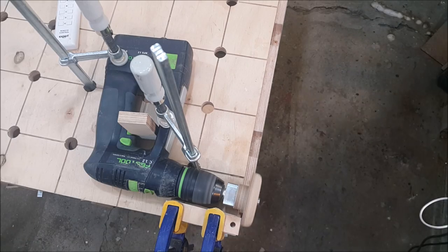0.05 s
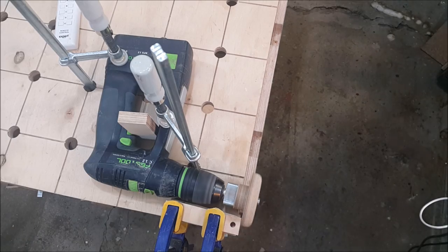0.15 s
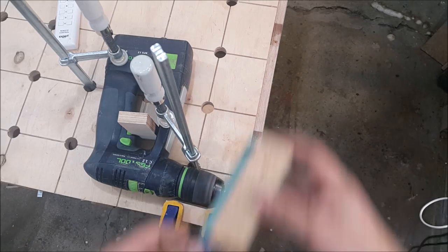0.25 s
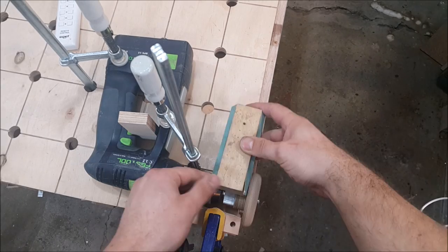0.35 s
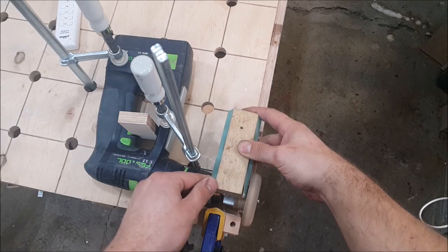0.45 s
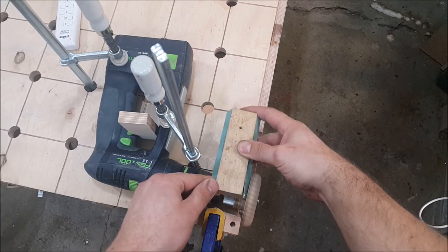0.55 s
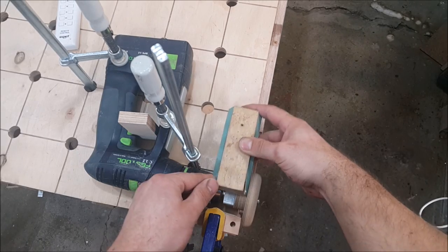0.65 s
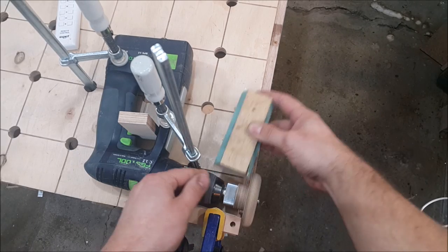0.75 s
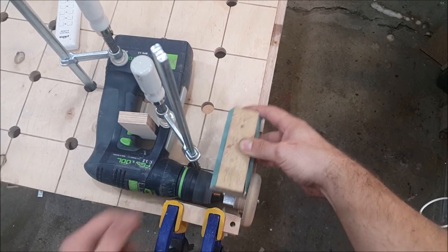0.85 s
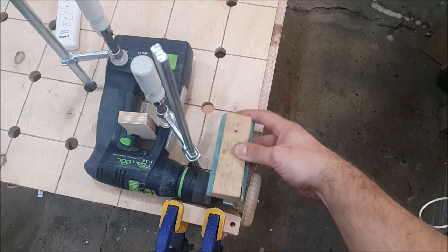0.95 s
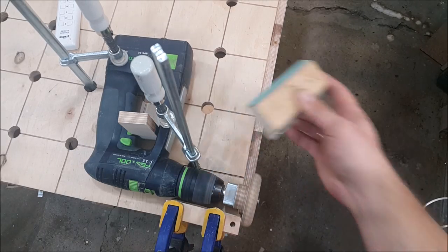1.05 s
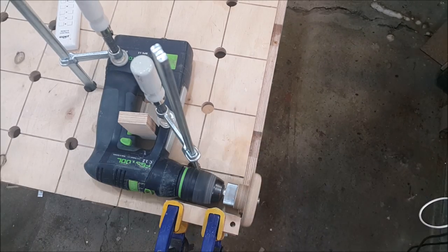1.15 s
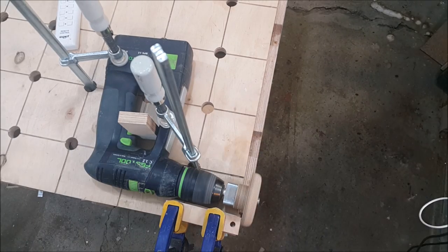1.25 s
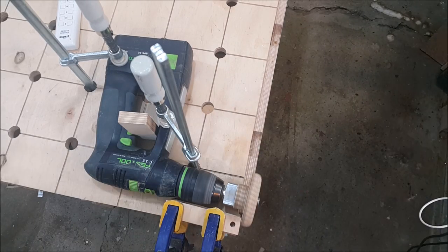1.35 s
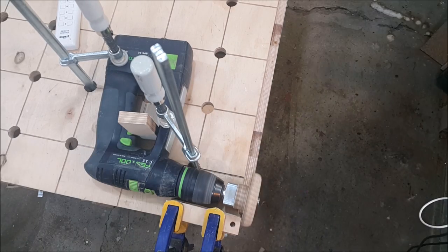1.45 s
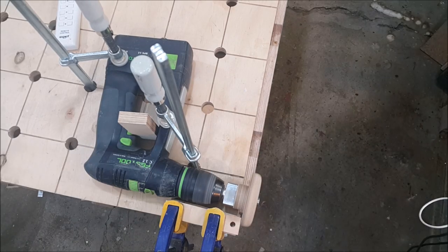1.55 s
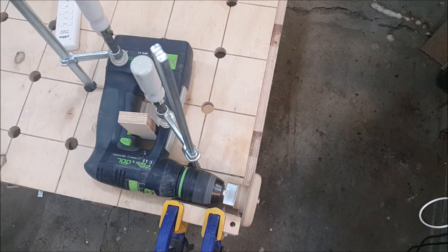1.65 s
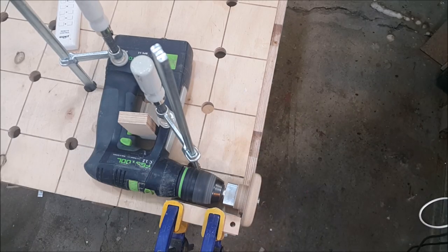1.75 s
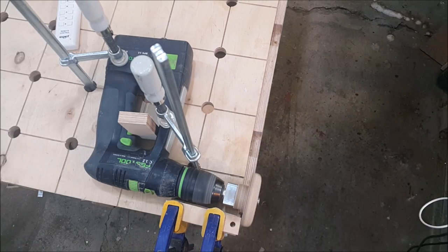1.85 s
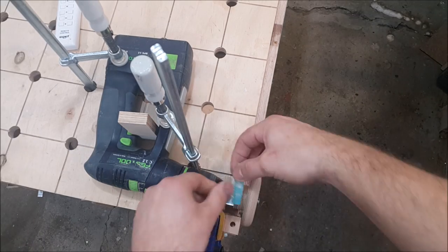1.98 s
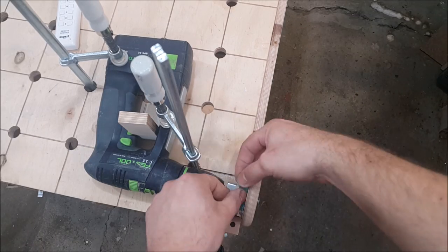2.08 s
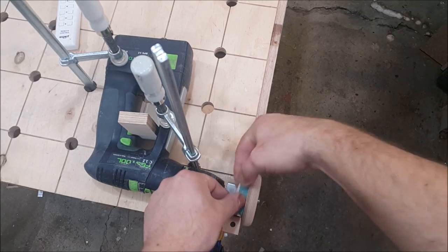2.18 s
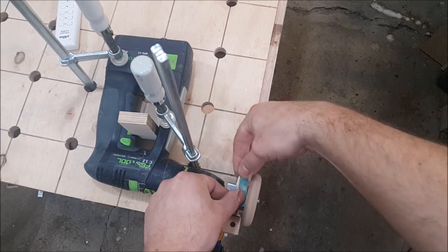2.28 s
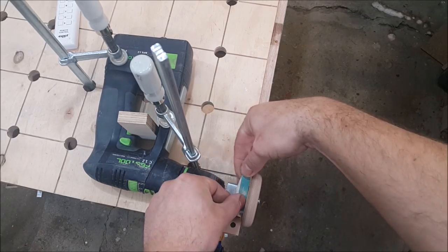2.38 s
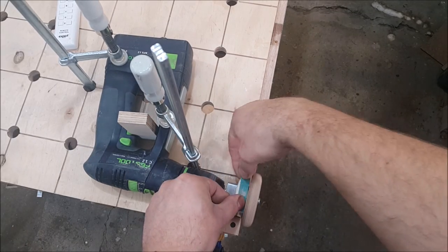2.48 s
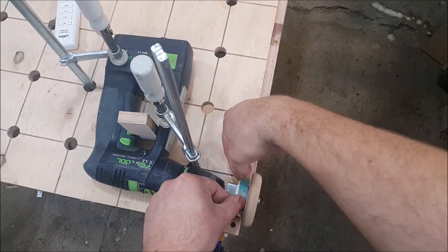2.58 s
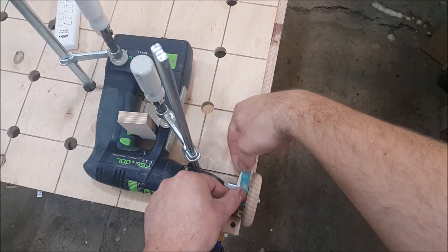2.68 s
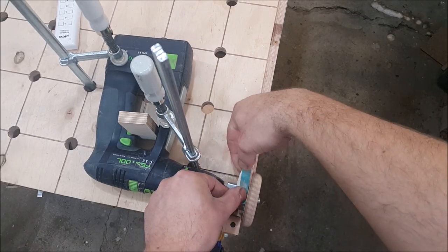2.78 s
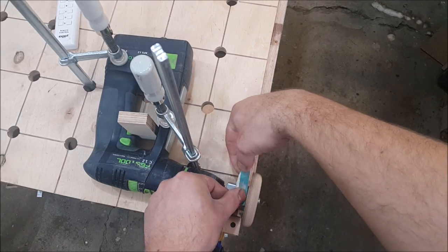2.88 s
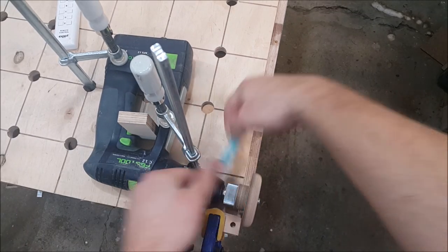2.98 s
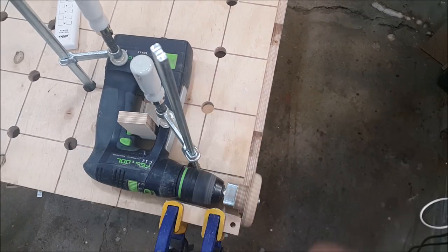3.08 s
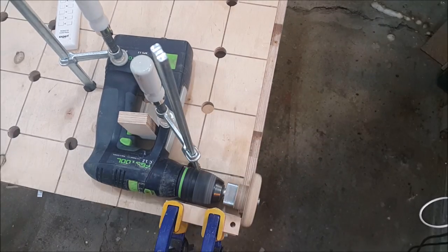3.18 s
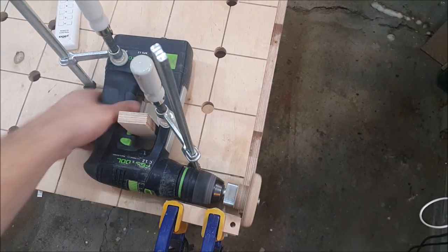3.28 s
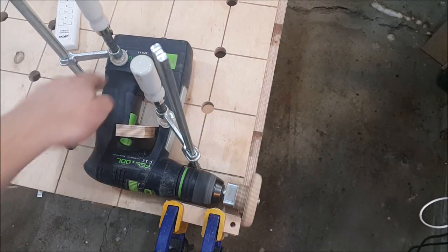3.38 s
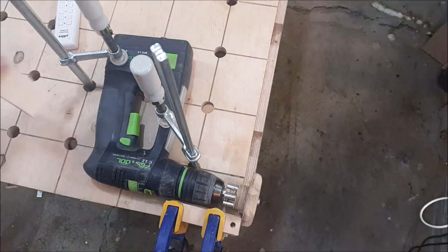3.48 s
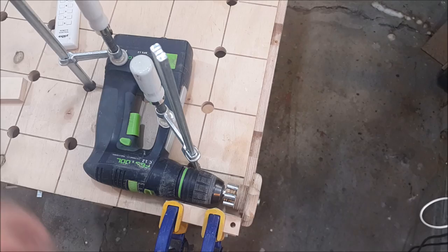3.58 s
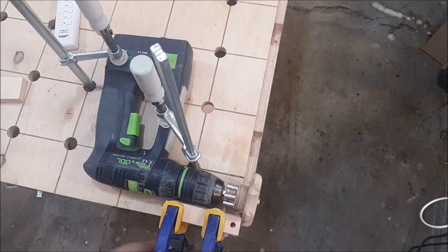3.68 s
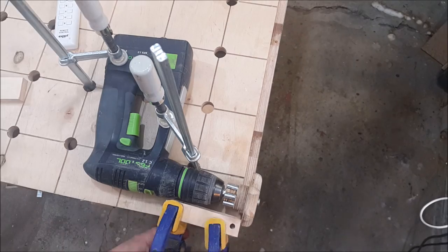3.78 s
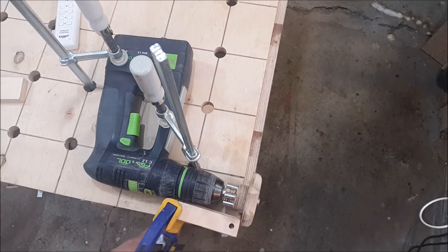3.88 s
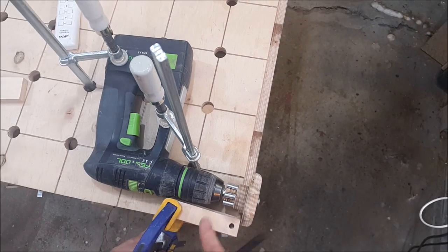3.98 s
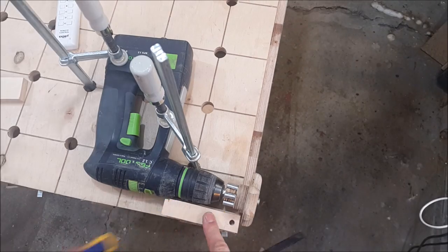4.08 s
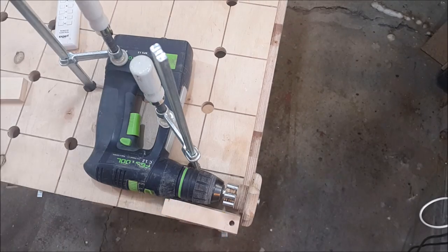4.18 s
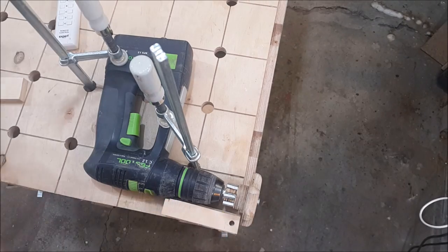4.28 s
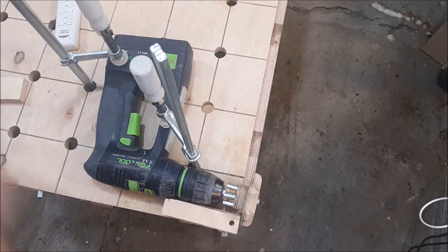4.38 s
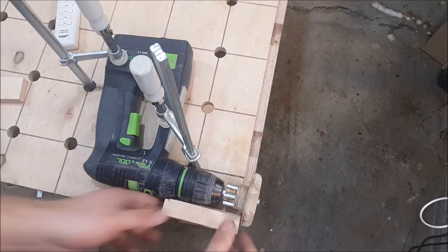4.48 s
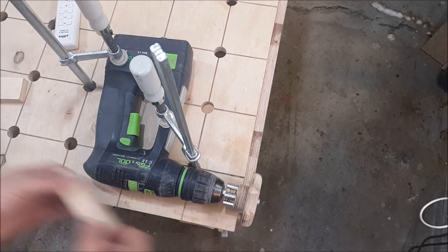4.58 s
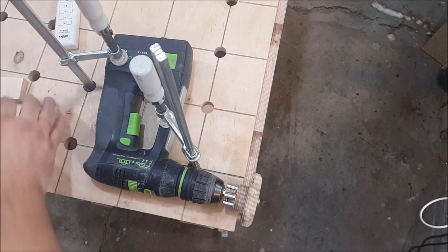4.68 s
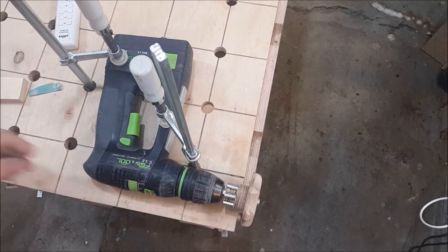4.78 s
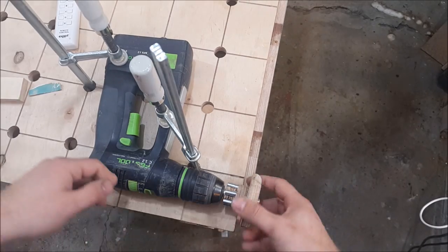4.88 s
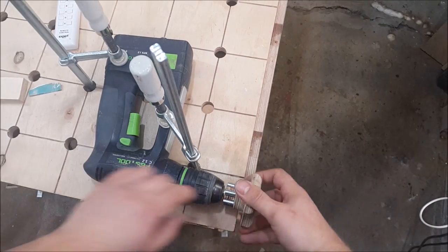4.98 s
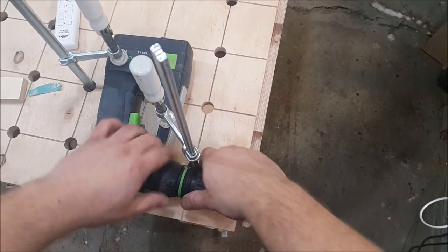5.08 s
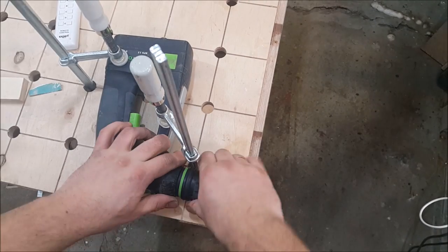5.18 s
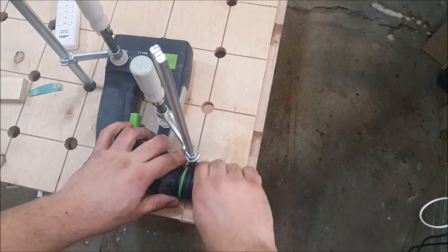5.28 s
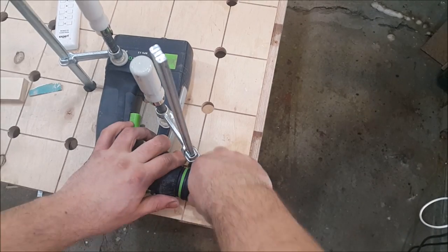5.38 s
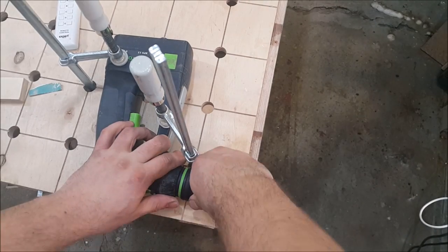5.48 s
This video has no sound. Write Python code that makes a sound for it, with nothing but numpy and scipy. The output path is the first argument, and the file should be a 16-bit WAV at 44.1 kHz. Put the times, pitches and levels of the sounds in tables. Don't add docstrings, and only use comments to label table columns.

```python
import sys
import numpy as np
from scipy import signal
from scipy.fft import rfft, irfft, next_fast_len
from scipy.io import wavfile
from scipy.ndimage import uniform_filter1d, minimum_filter1d

SR = 44100
rng = np.random.default_rng(int(sys.argv[2]) if len(sys.argv) > 2 else 0)


def inscribe(sig):
    pcm = np.round(np.clip(np.atleast_2d(sig).T, -1, 1) * 32767)
    wavfile.write(sys.argv[1], SR, pcm.astype(np.int16))


def makeup_ratio(level_db):
    decades = np.asarray(level_db, float) / 20
    return 10 ** decades


N = 244306
TIME = np.arange(N) / SR
HZ = np.fft.rfftfreq(next_fast_len(N), 1 / SR) + 1e-3
STOP_S = 3.537


def rms_one(x):
    return x / np.sqrt(np.mean(x ** 2) + 1e-20)


def in_time(rows):
    s, *columns = np.transpose(rows)
    return [np.interp(TIME, s, c) for c in columns]


def at_hz(points):
    hz, value = np.transpose(points)
    return np.interp(np.log(HZ), np.log(hz), value)


def modes(table, base_db):
    peaks = sum(makeup_ratio(2 * db) / (1 + (2 * (HZ - hz) / width) ** 2) for hz, width, db in table)
    return np.sqrt(makeup_ratio(2 * base_db) + peaks)


def drift(rate):
    steps_hz = 200
    steps = rng.standard_normal(int(N / SR * steps_hz) + 2)
    slow = signal.sosfiltfilt(signal.butter(1, min(rate, 90), fs=steps_hz, output="sos"), steps)
    return np.interp(TIME * steps_hz, np.arange(len(slow)), rms_one(slow))


def pan(db):
    return np.array([makeup_ratio(db / 2), makeup_ratio(-db / 2)])


# f/Hz, likeness 0-1
PORT_LIKENESS = [(60, 0.047), (300, 0.87), (700, 0.65), (1400, 0.83), (2500, 0.55), (4000, 0.5),
                 (8000, 0.32), (16000, 0.027)]
# f/Hz, left-right/dB
PORT_BALANCE = [(60, 2.5), (110, -10), (200, 13), (380, 6.5), (700, 1.5), (1290, 4), (2380, 1), (4400, 0.5),
                (8120, 4), (15000, 3.5)]


def stereo_noise(gain):
    lag_s = 5.5e-5
    size = next_fast_len(N)
    left, other = rfft(rng.standard_normal((2, size)))
    alike = np.clip(at_hz(PORT_LIKENESS), 0, 1)
    right = alike * left * np.exp(-2j * np.pi * HZ * lag_s) + np.sqrt(1 - alike ** 2) * other
    return rms_one(irfft(gain * pan(at_hz(PORT_BALANCE)) * [left, right], size)[:, :N])


def tone(hz, db, pan_db, lead):
    phase = 2 * np.pi * (np.cumsum(hz) / SR + rng.random())
    ports = np.sin([phase + lead / 2, phase - lead / 2])
    return np.sqrt(2) * makeup_ratio(db) * pan(np.atleast_1d(pan_db)) * ports


def add_ring(out, s, db, hz, t60, rise_s):
    after = TIME[:SR // 3]
    envelope = makeup_ratio(db - 60 * after / t60) * np.minimum(after / rise_s, 1)
    out[round(s * SR):][:len(after)] += envelope * np.sin(2 * np.pi * hz * after)


def running(fall_s, echo_db=-70):
    off = np.maximum(TIME - STOP_S, 0)
    return np.maximum(np.exp(-(off / fall_s) ** 2), makeup_ratio(echo_db - 60 * off / 0.4))


# t/s, droop of the whine/Hz
PRESSES = [
    [(.42, 0), (.6, 75), (.65, 133), (.815, 152), (.84, 12), (.93, 15), (.98, 60), (1.09, 62), (1.14, 0)],
    [(2.12, 0), (2.2, 55), (2.25, 130), (2.32, 0)],
    [(2.26, 0), (2.38, 150), (2.45, 190), (2.55, 140), (2.62, 265), (2.72, 270), (2.86, 180), (2.97, 250),
     (3.09, 0)],
]


def droop():
    return sum(in_time(press)[0] for press in PRESSES)


# t/s, f/Hz
FREE_PITCH = [
    (.42, 14157),
    (1.2, 14137),
    (2.12, 14135),
    (3.1, 14107),
    (3.4, 14109),
    (3.47, 14092),
]
# t/s, extra droop/Hz
BITES = [
    (2.168, 115),
    (2.285, 440),
    (2.488, 400),
    (2.725, 300),
    (3.017, 170),
    (3.54, 130),
]


def whine_pitch():
    bite_in_s, bite_out_s = .032, .035
    dips = sum(np.interp(TIME, [s - bite_in_s, s, s + bite_out_s], [0, hz, 0]) for s, hz in BITES)
    return in_time(FREE_PITCH)[0] - droop() - dips


# t/s, level/dB, left-right/dB, left lead/rad
WHINE = [(0, -42.5, 4, .7), (.3, -41, 2.5, .4), (.38, -38, -1, -1.2), (.44, -44, 2, -3.3),
         (.6, -41.5, 1, -3.2), (.65, -43, 1, -1.4), (.73, -43, -8, -1.9), (.8, -45, -13, -2.7),
         (.87, -38.5, -3, -2.95), (.94, -39, -6, -2.3), (1, -36, 0, -3.05), (1.09, -35.5, -1, -3),
         (1.15, -38, -2, -2), (1.22, -39, 5, -2.2), (1.29, -40, -4, -.7), (1.36, -48, 2, 2.3),
         (1.43, -45, 4, 1.9), (1.5, -49, 8, 2.2), (1.57, -43, 7, -.2), (1.64, -45.5, 14, -1.5),
         (1.72, -43, -1, -.7), (1.85, -40, 1, -.9), (1.95, -40.5, 10, -1.3), (2.06, -39.5, 2, -2),
         (2.13, -44, 12, -1.1), (2.2, -41, 9, 2.2), (2.34, -40, 6, 1.2), (2.41, -39, 1, -.6),
         (2.48, -44, 12, 1.5), (2.55, -38, 1, -.2), (2.62, -43, 15, 1.8), (2.69, -41, 8, 1.2),
         (2.78, -42, 14, 2.2), (2.97, -43, 16, 2.1), (3.04, -44, 8, .2), (3.11, -43, 14, -2.5),
         (3.16, -41, 8, -2.6), (3.2, -41, 4, -2.85), (3.27, -39.5, 2, -2.95), (3.31, -42, 6, -2.1),
         (3.39, -44, 15, -2.2), (3.45, -37, 7, -.3), (3.53, -40, 3, -1)]
# f/Hz, level/dB per Hz
HISS = [(250, -40.5), (380, -29.5), (600, -19), (850, -27.5), (990, -51.5), (1040, -11), (1300, -6.5),
        (1700, -7), (1880, -8), (2080, -8), (2300, -11.5), (3300, -8.5), (5900, -10), (14500, -6)]
# f/Hz, width/Hz, level/dB
HOUSING = [(3400, 93, 7.5), (1570, 380, -3.5), (5020, 590, 4)]
# f/Hz, width/Hz, depth/dB
SHADOWS = [(1316, 58, 13), (1902, 99, 7.5), (2297, 73, 4), (3100, 78, 2.5), (3690, 160, 0.5), (4205, 63, 0),
           (5120, 91, 6), (6940, 120, -1.5)]


def motor():
    slots, full_droop_hz = 11, 165
    whine_hz, free_hz = whine_pitch(), in_time(FREE_PITCH)[0]
    whine_db, whine_pan, lead = in_time(WHINE)
    load = np.minimum((free_hz - whine_hz) / full_droop_hz, 1) ** 7.1

    flutter = makeup_ratio(1.8 * np.array([drift(20), drift(20)]))
    whine = tone(whine_hz + 5.0 * drift(40), whine_db + 1, whine_pan, lead + .12 * drift(15))

    hum_hz = (.6 * whine_hz + .4 * (free_hz - droop())) / slots
    hum_db = -51.3 + 6.5 * load + .7 * drift(20)
    hum = tone(hum_hz + .7 * drift(15), hum_db, 3.5 * load, .05 + .3 * load)

    colour = makeup_ratio(at_hz(HISS)) * modes(HOUSING, base_db=2.5) / modes(SHADOWS, base_db=-0.5)
    hiss = makeup_ratio(-38.5 + 0.67 * drift(31)) * stereo_noise(colour)
    return (flutter * whine + hum) * running(0.0063) + hiss * running(0.02, echo_db=-33.0)


def scratch_db():
    full_db, range_db, soft_droop_hz = -37, 28, 37.6
    pressure = uniform_filter1d(droop(), size=2600)
    return full_db - range_db * np.exp(-pressure / soft_droop_hz)


# multiple of mesh rate, level/dB, left-right/dB, left lead/rad
MESH = [(2.204, -77, 7, 0.51), (3, -62.5, -9, 0.099), (4, -53, 2, 0.74), (3.772, -76, 5.5, .5),
        (4.229, -70.5, 2.5, 0.39), (5, -59.5, -2.5, 0.21), (6, -58.5, -9.5, 0.13), (6.767, -64, 3, 0.18),
        (7, -64.5, -7.5, 1.5), (7.46, -66, -8.5, 0.28), (7.767, -61, -0.5, 0.44), (8, -57.5, 9.5, 0.29),
        (9.18, -67, 2, 0.65), (10, -62.5, 9, 1.5), (11, -74, 0, .5), (12, -65, 5.5, 0.5)]


def gears():
    free_mesh_hz, free_whine_hz = 420.2, 14144
    load = np.clip((scratch_db() + 56) / 15, 0, 1)
    mesh_hz = free_mesh_hz * whine_pitch() / free_whine_hz + (.6 + 2.5 * load) * drift(14)
    lines = 0
    for multiple, db, pan_db, lead in MESH:
        lines = lines + tone(multiple * mesh_hz, db - 7 * load + 1.6 * drift(4.9), pan_db, lead)
    return lines * running(0.0046)


# f/Hz, level/dB per Hz
SCRATCH = [(220, -68), (330, -28.5), (600, -25.5), (980, -24.5), (1060, -0.5), (1330, -7), (1560, -3.5),
           (2400, -8.5), (4500, -22.5), (7000, -5.5), (11000, -5), (14500, -8)]
# f/Hz, width/Hz, level/dB
WHEEL = [(1494, 17, -12.5), (600, 9.5, -0.5), (334.2, 29, -12.5), (453.3, 6.17, -0.5), (1149, 16, -19)]
# f/Hz, width/Hz, level/dB
BLOCK_BANDS = [(12060, 620, 10.5), (9300, 290, -1), (339, 9.1, 15.5)]
# f/Hz, width/Hz, level/dB
STRIP_BANDS = [(9160, 260, 8.5), (12900, 730, 3), (13900, 1600, 6)]


def sanding():
    strip_s = 1.6
    press_db = scratch_db()
    grain_filter = signal.butter(1, 700, fs=SR, output="sos")
    grains = rms_one(signal.sosfilt(grain_filter, rng.standard_normal(N)))
    grit_db = press_db + 0.6 * drift(30) + 1.6 * drift(99) + 1.3 * grains
    grit = makeup_ratio(grit_db) * running(0.026)

    colour = makeup_ratio(at_hz(SCRATCH)) * modes(WHEEL, base_db=-22.5) / modes(SHADOWS, base_db=3.0)
    block = makeup_ratio(-0.7) * stereo_noise(colour * modes(BLOCK_BANDS, base_db=2.8))
    strip = makeup_ratio(1.2) * stereo_noise(colour * modes(STRIP_BANDS, base_db=-2.0))

    sing_db = -57 + 1.9 * (press_db + 37) + 2.5 * drift(6.9)
    sing = tone(1512 + 4.0 * drift(5.8), sing_db, 2.5, .4) * (TIME > strip_s)
    return makeup_ratio(-1.5) * grit * np.where(TIME < strip_s, block, strip) + sing


def sharp_onset(gain):
    mirrored = np.r_[gain, gain[-2:0:-1]]
    return np.exp(np.conj(signal.hilbert(np.log(mirrored))))[:len(HZ)]


# t/s, peak level/dB, thud rel/dB, crack rel/dB
CLAMPS = [(1.6184, -52, -26, 27), (3.5357, -39, -47, 8), (3.5444, -31, -14, 13), (3.557, -33.5, -20, -36),
          (3.6226, -28.5, -15, -10), (3.6379, -38.5, -2, 24), (3.6537, -38, -11.5, 16.5),
          (3.7155, -48.5, -8, -5), (3.724, -60, -9, 7), (3.7797, -28.5, -5, 8), (3.8358, -35, -3, 11),
          (3.8435, -39, -17, -15), (3.918, -60.5, 10, -16), (4.0745, -50, 4.5, 8.5), (4.0456, -64, -14, 14),
          (4.1349, -57.5, -7, 10), (4.155, -50.5, -9, -1), (4.0804, -47.5, -4, -6), (4.1672, -44, -7, 8.5),
          (4.1757, -63, -11, 3), (4.225, -58, -1, 8.5), (4.2322, -78, -7, 2)]
# t/s, peak level/dB, thud rel/dB, crack rel/dB
BLOCKS = [(4.351, -21, -11, -1.5), (4.3635, -26.5, 0, 1), (4.378, -32.5, -1, -6), (4.3991, -21.5, -7, 2),
          (4.4114, -22, -22, 3), (4.4195, -27, 2.5, 2.5), (4.432, -23.5, -16, -3.5), (4.4474, -30, 2.5, 12),
          (4.4555, -33, -8, 7), (4.4628, -32, -18, 9), (4.472, -50.5, 12.5, -12),
          (4.5555, -49.5, -4.5, -10), (4.7218, -62.5, 20, -2), (4.7262, -47, -13, 5),
          (4.7406, -47.5, 9.5, 5), (4.7579, -38, -9.5, -25), (4.775, -53.5, 17, -25),
          (4.7808, -35.5, -11, 15.5), (4.785, -38.5, 3, 19), (4.7925, -40, -5, -17)]
# t/s, peak level/dB, thud rel/dB, crack rel/dB
CHUCK = [(4.9475, -50, 3, -13), (4.965, -72, -7, -5), (4.9945, -48.5, 0.5, -4), (4.9995, -55, -12, -1),
         (5.027, -49, -15, -13), (5.036, -51, 8, 2), (5.0932, -58, 3, -10), (5.1307, -68, -23, 12),
         (5.144, -48.5, -22, -5), (5.2034, -61, -16, 2), (5.215, -51, -3, 7.5), (5.2182, -45, 0, -1),
         (5.2358, -49.5, -2, 7), (5.274, -44, -5, -3), (5.2854, -52, 3, 2), (5.321, -50, -17, 6.5),
         (5.3333, -49, -27, 5), (5.3692, -47.5, -20, 3), (5.3998, -60, -1, 12), (5.4135, -54, 6.5, 7),
         (5.4198, -51, -1, 14), (5.4638, -56, -20, 6), (5.475, -55, -20, 8), (5.495, -42, -5, 8)]
# f/Hz, width/Hz, level/dB
WOOD = [(590, 110, 7.5), (1090, 15, 9), (1237, 93, 3.5), (1550, 360, 4.5), (2250, 140, -0.5),
        (2656, 200, 2.5), (3370, 420, -1)]
# f/Hz, level/dB per Hz
THUD = [(150, -48), (350, -59.5), (480, -0.5), (700, 1.5), (1000, 5), (1400, -5)]
# f/Hz, level/dB per Hz
KNOCK = [(600, -46), (950, 3.5), (1800, 6.5), (3300, 6), (5000, -25.5), (9000, -31.5)]
# f/Hz, level/dB per Hz
CRACK = [(1800, -41.5), (3000, -14), (4500, -1.5), (8000, 0.5), (12000, -3.5), (16000, -6)]


def knocks():
    actions = [(CLAMPS, 0.088, -.4), (BLOCKS, 0.11, -0.75), (CHUCK, 0.088, -0.21)]
    after = np.arange(int(.16 * SR)) / SR
    power = np.zeros((3, 2, N + len(after)))
    clicks = np.zeros((3, 2, next_fast_len(N)))
    cut_s = 0.016 * np.array([[1.7], [1.1], [.95]])
    lasting = np.array([[1.6], [1.05], [.8]])
    for contacts, t60, pan_db in actions:
        ring = makeup_ratio(-60 * after / (t60 * lasting)) * np.exp(-(after / cut_s) ** 4)
        tail = ring + makeup_ratio(-45.5 - 60 * after / (0.072 * lasting))
        tail = tail * (1 + 0.26 * np.exp(-after / 0.00014))
        tail = tail * np.minimum(after / .0005, 1)
        for s, db, thud_db, crack_db in contacts:
            i = round(s * SR)
            level = makeup_ratio(db + np.array([thud_db, 0, crack_db]))[:, None] * pan(pan_db)
            power[:, :, i:i + len(after)] += (level[:, :, None] * tail[:, None]) ** 2
            clicks[:, :, i + np.array([0, 2])] += level[:, :, None] * np.eye(2)

    wood, out = modes(WOOD, base_db=-14.5), 0
    for k, (colour, click_db) in enumerate([(THUD, -3), (KNOCK, 1.5), (CRACK, 3)]):
        gain = makeup_ratio(at_hz(colour)) * wood
        envelope = np.sqrt(power[k, :, :N]) * makeup_ratio(1.8 * drift(75))
        out = out + makeup_ratio(-10.0) * envelope * stereo_noise(gain)
        click = irfft(rfft(clicks[k]) * sharp_onset(gain) / gain.mean(), clicks.shape[-1])
        out = out + makeup_ratio(click_db) * click[:, :N]
    return out


# t/s, f/Hz, level/dB, t60/s
RINGS = [(3.623, 2250, -28, 0.028), (4.353, 1707, -29, 0.12), (4.354, 1790, -43, 0.058),
         (4.352, 3400, -26.5, 0.057), (4.412, 3310, -26.5, 0.035), (4.47, 557, -61, 0.2),
         (4.352, 556, -39, 0.19), (4.412, 590, -24.5, 0.071), (4.421, 590, -35, 0.18),
         (4.45, 1725, -29.5, 0.059), (4.721, 600, -47, 0.11), (4.785, 641, -52, 0.22),
         (4.821, 990, -61, 0.1), (5.146, 1090, -41.5, 0.058), (5.28, 1090, -48, 0.067)]


def rings():
    out = np.zeros(N + SR)
    for s, hz, db, t60 in RINGS:
        add_ring(out, s, db, hz, t60, rise_s=0.0031)
    return out[:N] * pan(2.2)[:, None]


# t/s, peak level/dB, left-right/dB, f/Hz
SNAPS = [(3.5384, -25, 5, 4270), (3.5435, -21, 11, 7450), (3.6234, -22.5, 1, 3940), (3.637, -33, -2, 5970),
         (3.6564, -28, -4, 6040), (3.7804, -30, 1, 12000), (3.8365, -23, 10, 11200), (4.0473, -57, 3, 8000),
         (4.0803, -43, 5, 4993), (4.1362, -52, 0, 5000), (4.1675, -25.5, 15.5, 7700),
         (4.1765, -23.5, -5, 7100), (4.2252, -40, 17, 7000), (4.3512, -28, -2, 4500),
         (4.364, -33, -6, 3500), (4.4004, -25, 3, 8000), (4.413, -23, -3, 11000), (4.4205, -30, 1, 8000),
         (4.4336, -24, -1, 11000), (4.4492, -20, 7, 5500), (4.465, -25, 2, 8000), (4.556, -59, 2, 4000),
         (4.7266, -44, 3, 8000), (4.7584, -36, -1, 2960), (4.7813, -23, 21, 9400), (4.9487, -42, 4, 7550),
         (4.9653, -56, 3, 8000), (5, -44, 5, 14500), (5.0397, -51, 3, 6000), (5.1318, -48, 0, 5000),
         (5.143, -44, 2, 1700), (5.2191, -45, 4, 9000), (5.3224, -48, 3, 11000), (5.3452, -49, 3, 10000),
         (5.4139, -46, 3, 6000), (5.42, -27.5, 8.5, 8100), (5.4937, -34, 2, 10000)]


def snaps():
    cycles, edge_hz, edge_db = 9.0, 13500, -3
    out, after = np.zeros((2, N + SR)), TIME[:SR // 100]
    for s, db, pan_db, hz in SNAPS:
        fade = makeup_ratio(db + 6 - 60 * after * hz / cycles) * np.minimum(after / 0.00012, 1)
        for port, lag in enumerate([-2, 0]):
            edge_turns = edge_hz * after * rng.uniform(0.87, 1.03) + rng.random()
            edge = makeup_ratio(edge_db - 60 * after / 0.0011) * np.sin(2 * np.pi * edge_turns)
            body = np.sin(2 * np.pi * hz * rng.uniform(0.72, 1.47) * after)
            out[port, round(s * SR) + lag:][:len(after)] += pan(pan_db)[port] * fade * (body + edge)
    return out[:, :N]


# t/s, length/s, dull rub level/dB, bright rustle rel/dB
HANDS = [(3.578, 0.023, -80, 9), (3.68, 0.017, -89, -1), (3.706, 0.015, -78, 8), (3.8, 0.011, -71.5, 6),
         (3.863, .015, -64.5, -7), (3.886, 0.021, -84, 0), (3.969, 0.12, -79, 7.5), (4.056, 0.022, -63, -1),
         (4.1, 0.041, -75, 10.5), (4.188, 0.0083, -71, -18), (4.488, 0.13, -67.5, -8),
         (4.514, 0.078, -73, 8), (4.646, 0.1, -81, 5), (4.785, 0.077, -64.5, -15), (4.924, 0.16, -67, -19),
         (5.08, 0.1, -68, -6), (5.192, 0.12, -66, -1), (5.314, 0.054, -64.5, 2.5),
         (5.382, 0.037, -60.5, -10.5), (5.445, 0.071, -68.5, -42)]
# f/Hz, level/dB per Hz
RUB = [(150, -71), (300, -27), (615, -10.5), (976, -16), (1100, -11.5), (1900, -17), (3500, -27),
       (7000, -36.5)]
# f/Hz, level/dB per Hz
RUSTLE = [(1760, -16.5), (3000, -10.5), (3730, -16.5), (4800, -18.5), (6500, -19.5), (8700, -14),
          (16000, -31)]


def hands():
    rest_db = np.array([[-85.5], [-79.5]])
    in_s, out_s = 0.014, 0.016
    power = np.ones(N) * makeup_ratio(2 * rest_db)
    for s, length, db, rustle_db in HANDS:
        fade = np.exp(-np.maximum(TIME - s - length, 0) / out_s)
        stroke = np.clip((TIME - s) / in_s, 0, 1) * fade
        power += (makeup_ratio(db + np.array([[0], [rustle_db]])) * stroke) ** 2
    rub = makeup_ratio(3.05 * drift(34)) * stereo_noise(makeup_ratio(at_hz(RUB)) * modes(WOOD, base_db=22.0))
    rustle = makeup_ratio(2.6 * drift(60)) * stereo_noise(makeup_ratio(at_hz(RUSTLE)))
    return (np.sqrt(power[0]) * rub + np.sqrt(power[1]) * rustle) * (TIME > STOP_S)


# t/s, level/dB, f/Hz, t60/s
JOLTS = [(1.03, -85, 70, 0.13), (1.885, -80, 100, .08), (1.885, -79, 180, 0.09), (3.47, -89, 75, .3),
         (3.623, -73, 89.5, 0.091), (3.779, -65.5, 65, 0.062), (3.837, -67, 100, 0.057),
         (4.14, -91, 70, 0.088), (4.351, -77, 60, 0.087), (4.4, -74, 50, .1), (4.44, -71, 110, 0.085),
         (4.6, -83, 140, 0.11), (4.721, -72, 120, 0.12), (4.778, -72, 100, 0.087), (5.41, -90, 90, .12),
         (5.49, -80, 90, .1)]


def jolts():
    out = np.zeros(N + SR)
    for s, db, hz, t60 in JOLTS:
        add_ring(out, s, db, hz, t60, rise_s=0.0052)
    return out[:N] * pan(2.5)[:, None]


# f/Hz, level/dB per Hz
RUMBLE = [(8, 7.5), (18, 13.5), (30, -34), (60, -22), (120, -52), (300, -58)]


def rumble():
    return makeup_ratio(-88.5 + 1.5 * drift(9)) * stereo_noise(makeup_ratio(at_hz(RUMBLE)) * (HZ < 400))


def scene():
    bench = motor() + gears() + sanding() + knocks() + rings() + snaps() + hands()
    small_ports = signal.butter(2, 330, "high", fs=SR, output="sos")
    return signal.sosfilt(small_ports, bench) + jolts() + rumble()


# f/Hz, level/dB
FLICKER_LIMITS = [(60, -50), (150, -25), (300, -17.5), (600, -17.5), (800, -16), (980, -14.5), (1060, -15),
                  (1800, -9), (2500, -9), (3000, -9), (3700, -7), (6800, -7), (8000, -13), (15000, -11)]


def flicker_bands(x):
    lead_in = 409
    padded = np.pad(x, [(0, 0), (lead_in, 0)])
    hz, _, frames = signal.stft(padded, SR, window="cosine", nperseg=2048)
    power = np.mean(abs(frames) ** 2, axis=0) + 1e-20
    power = uniform_filter1d(power, size=2, axis=1)
    steady_db = minimum_filter1d(10 * np.log10(power.mean(axis=0)), size=9)

    bands = power[:-1].reshape(256, 4, -1).mean(axis=1)
    whim_db = 4.5 * rng.standard_normal(bands.shape) * (hz[:-1:4, None] < 1000)
    band_db = np.repeat(10 * np.log10(bands) + whim_db, 4, axis=0)
    band_db = band_db[np.minimum(np.arange(len(hz)), 1023)]

    edge_hz, depth_db = np.transpose(FLICKER_LIMITS)
    limit_db = np.interp(np.log(hz + 1), np.log(edge_hz), depth_db)[:, None]
    margin_db = band_db - steady_db - limit_db
    opening = .5 + .5 * np.tanh(margin_db / 0.11)
    kept = np.maximum(opening, makeup_ratio(-24) * (hz[:, None] > 420))
    return signal.istft(frames * kept, SR, window="cosine", nperseg=2048)[1][:, lead_in:N + lead_in]


def roll_off(x):
    return signal.sosfilt(signal.butter(12, 16820, fs=SR, output="sos"), x)


OFFSET = [
    [-1.2e-4],
    [-1.05e-4],
]


def record(dry):
    dry = flicker_bands(dry)
    power = np.mean(dry ** 2, axis=0)
    blow = uniform_filter1d(power, size=128) > 5 * uniform_filter1d(power, size=2048)
    sharp = uniform_filter1d(1. * blow, size=256)
    low = signal.sosfilt(signal.cheby2(16, 42, 15900, "low", fs=SR, output="sos"), dry)
    top = signal.sosfilt(signal.cheby2(16, 42, 15900, "high", fs=SR, output="sos"), dry)
    mix = low + makeup_ratio(-10) * sharp * top + OFFSET
    return roll_off(mix)


dry = scene()
out = record(dry)
inscribe(out)
```